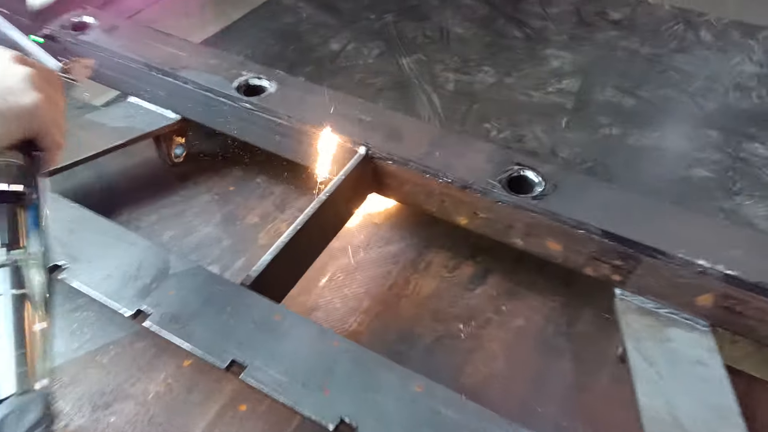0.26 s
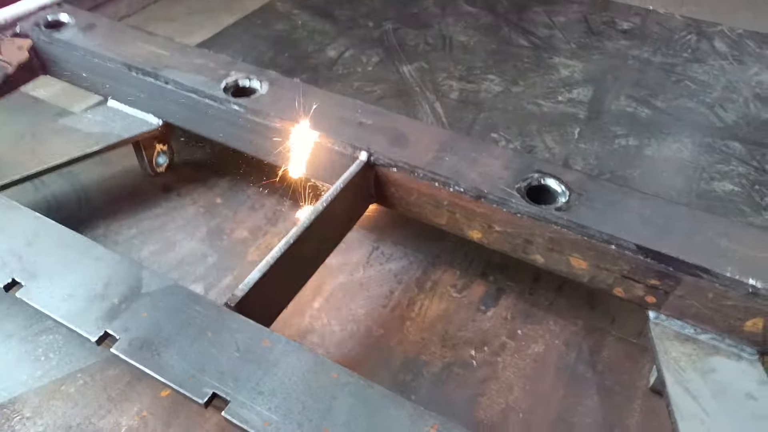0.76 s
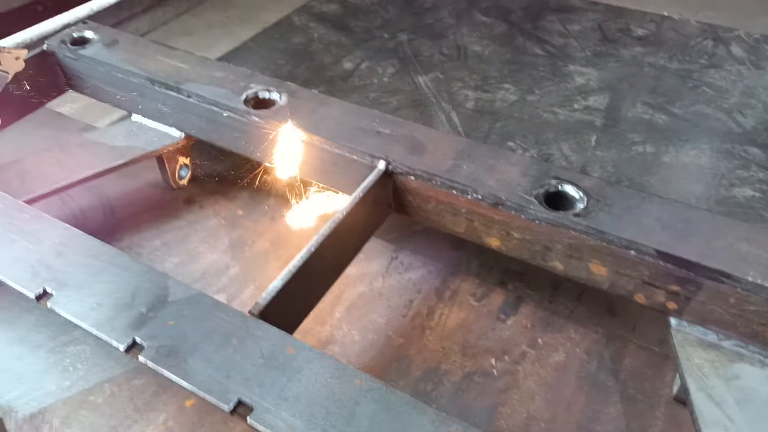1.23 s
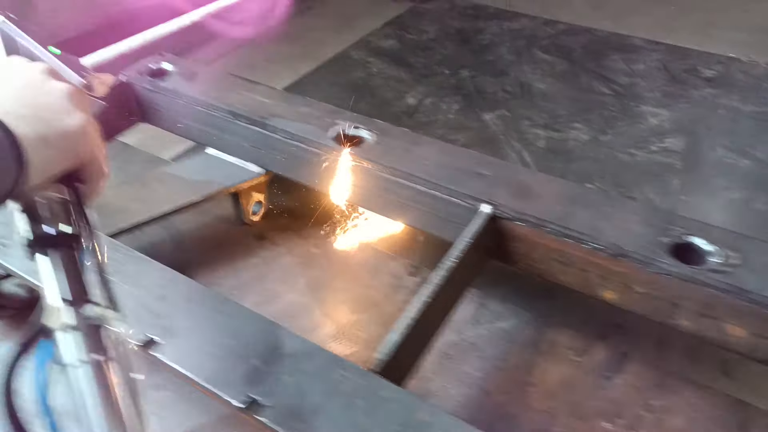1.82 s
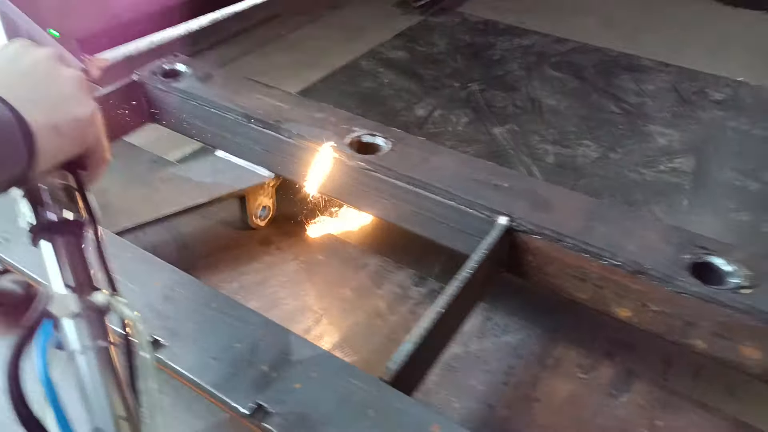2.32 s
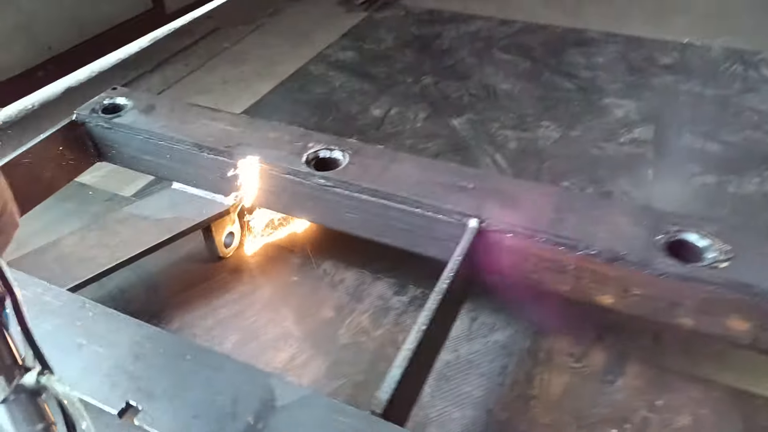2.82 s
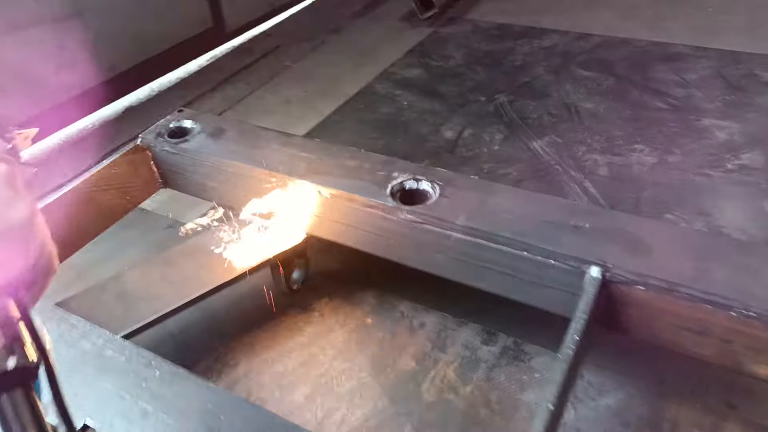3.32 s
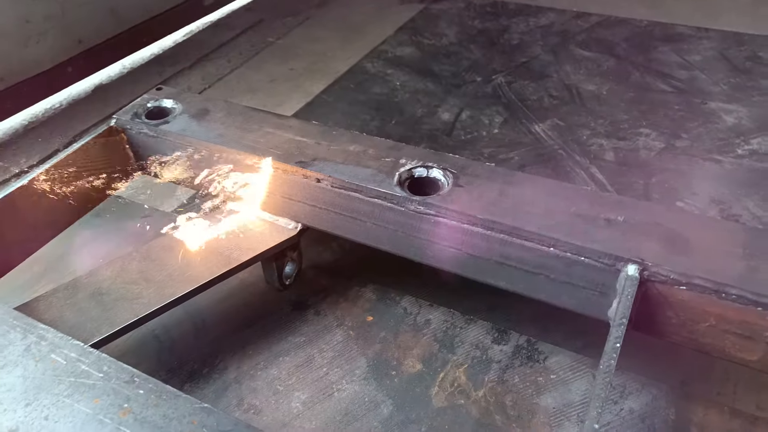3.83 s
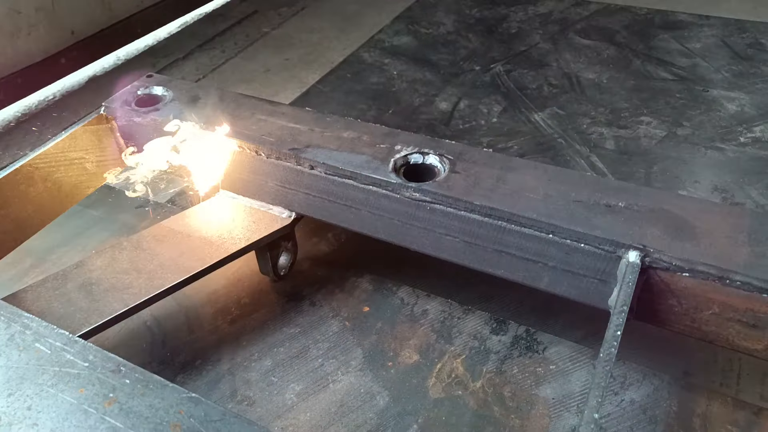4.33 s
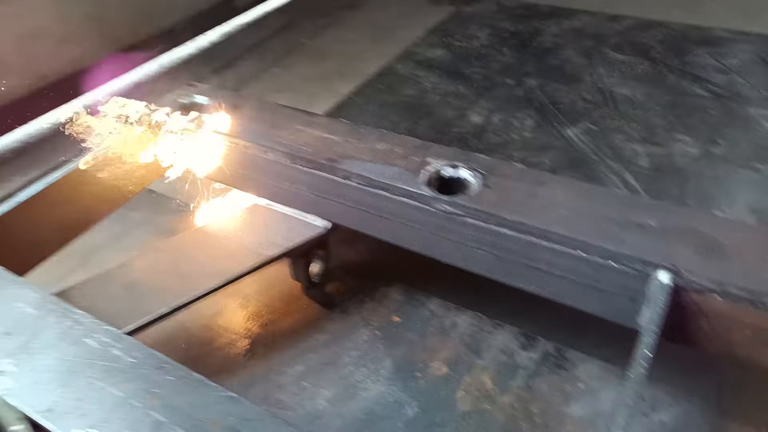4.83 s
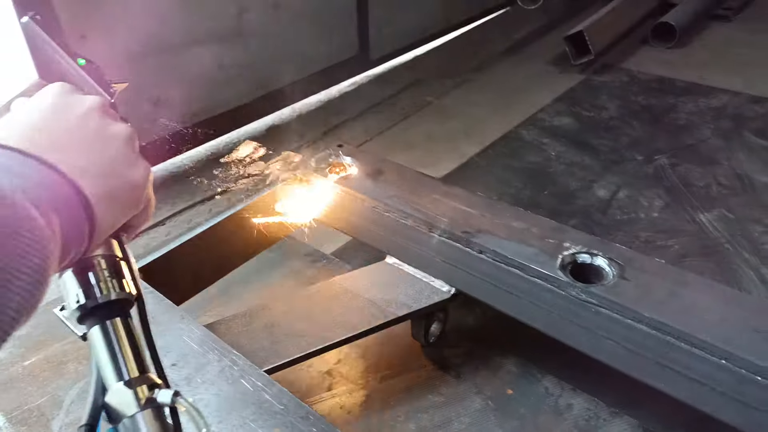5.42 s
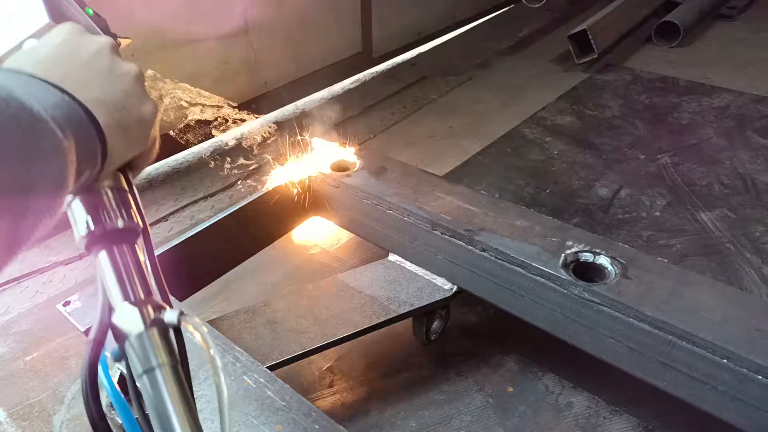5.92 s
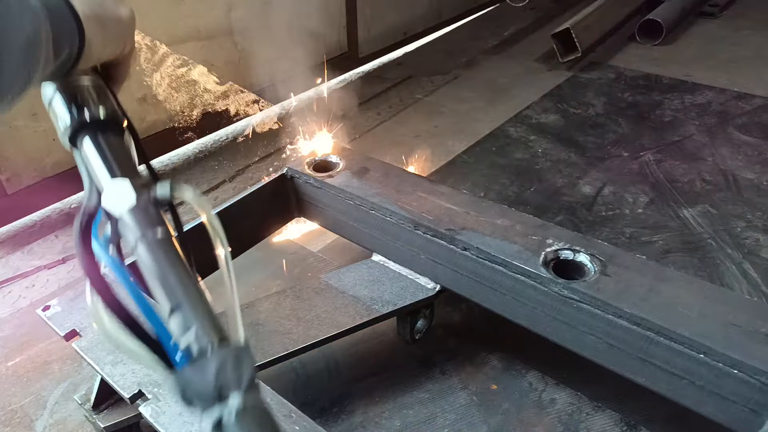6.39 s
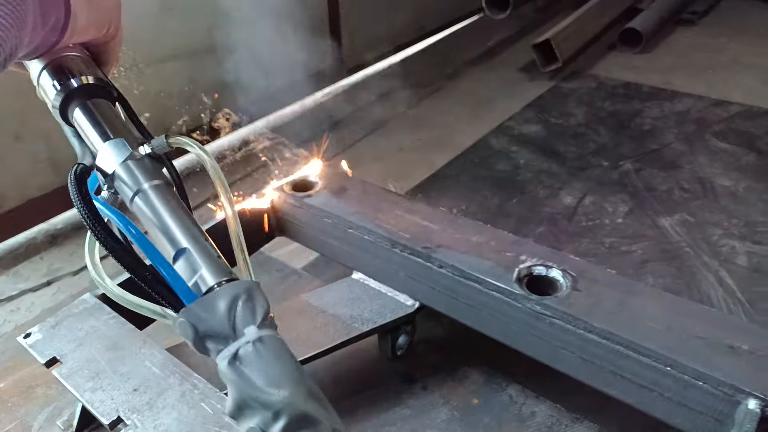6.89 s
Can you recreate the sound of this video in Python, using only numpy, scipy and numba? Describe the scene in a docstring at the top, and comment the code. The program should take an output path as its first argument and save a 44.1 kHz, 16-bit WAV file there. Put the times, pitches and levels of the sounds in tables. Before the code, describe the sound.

Handheld laser cleaner on a steel frame: steady shrill whine and hiss, rapid thirty-per-second burning bursts, crackling scale, occasional sharp pops in a workshop.

```python
"""In a workshop, a handheld laser cleaner strips a steel frame at arm's length from a phone.
The air jet that shields its lens is a self-sustained oscillator: it whistles unsteadily near 3 kHz.
Its turbulence rings the nozzle and hisses off the steel, where reflections comb the noise.
The beam swings to and fro about 32 times a second; each crossing of the metal knocks, puffs and sputters
as coating burns, through resonant gaps in the frame, with flame, crackling scale and popping flakes."""
import sys
import numpy as np
from scipy import signal
from scipy.fft import rfft, irfft
from scipy.io import wavfile
from scipy.ndimage import uniform_filter1d
from numba import njit

SR = 44100
rng = np.random.default_rng(int(sys.argv[2]) if len(sys.argv) > 2 else 0)


def store_wav(level_fs):
    """Save 16-bit WAV to argv[1]."""
    pcm = np.round(np.clip(np.atleast_2d(level_fs), -1, 1) * 32767)
    wavfile.write(sys.argv[1], SR, pcm.T.astype(np.int16))


N = 315315
TIME = np.arange(N) / SR  # seconds


def undb(db):
    """Level: decibels converted to an amplitude ratio."""
    return 10 ** (np.asarray(db) / 20)


def unit(x):
    """Normalisation: scale to rms 1."""
    return x / np.sqrt(np.mean(x ** 2))


def curves(table):
    """Linear interpolation: each column after the first, as a curve in time."""
    seconds, *columns = np.transpose(table)
    return [np.interp(TIME, seconds, column) for column in columns]


def noise():
    """White noise: turbulence with equal power at every frequency."""
    return rng.standard_normal(N)


def colour(x, points):
    """Spectral shaping: weight x by (Hz, dB) points joined over log frequency, then scale to rms 1."""
    hz, db = np.transpose(points)
    bins = np.maximum(np.arange(N // 2 + 1) * SR / N, 1)
    gain = undb(np.interp(np.log(bins), np.log(hz), db))
    return unit(irfft(rfft(x) * gain, N))


def wander(rate):
    """Low-passed random process: smooth chance of rms 1, mostly slower than rate in Hz."""
    bins = np.arange(N // 2 + 1) * SR / N
    return unit(irfft(rfft(noise()) / (1 + (bins / rate) ** 3), N))


@njit
def svf(x, hz, width):
    """Second-order resonance: a state-variable band-pass with a moving centre."""
    out, band, low = np.empty(len(x)), 0., 0.
    for i in range(len(x)):
        g, damping = np.tan(np.pi * hz[i] / SR), width / hz[i]
        v = (band + g * (x[i] - low)) / (1 + g * (g + damping))
        band, low = 2 * v - band, low + 2 * g * v
        out[i] = damping * v
    return out


def ring(x, hz, width):
    """Cascaded resonance: two equal band-passes, each width Hz wide, give steep skirts; rms 1."""
    hz = hz * np.ones(N)
    once = svf(x + 1e-18, hz, float(width))
    return unit(svf(once, hz, float(width)))


def flare_up(rows, rest_db, attack_s, release_s):
    """Energy addition: (start, length, dB) events rise up to the start, hold and die away, over a rest level."""
    power = undb(rest_db) ** 2
    for start, length, db in rows:
        rise = np.clip(1 + (TIME - start) / attack_s, 0, 1)
        fall = np.exp(-np.clip((TIME - start - length) / release_s, 0, 20))
        power = power + (undb(db) * rise * fall) ** 2
    return np.sqrt(power)


# Pitch of the jet's whistle. Each row: time in seconds, frequency in Hz.
JET_PITCH = [(0.1, 3005), (0.46, 2892), (1.75, 2966), (4.73, 2980), (7.0, 2917)]
# How strongly the whistle reaches the phone as the nozzle turns.
# Each row: time in seconds, relative level in dB.
JET_LEVEL = [(0.0, -15.5), (0.04, -17.5), (0.28, -19), (1.33, -17), (1.49, -15.5), (1.77, -24.5),
             (2.05, -16.5), (2.43, -19), (2.47, -17), (3.48, -10), (4.22, -8), (5.5, -8.5), (5.83, -11),
             (5.87, -9), (6.97, -12), (7.15, -10.5)]


def whistle():
    """Self-sustained oscillation: turbulence shakes the jet's pitch within the range the nozzle allows."""
    (hz,), (db,) = curves(JET_PITCH), curves(JET_LEVEL)
    shaken_hz = hz + 170 * np.tanh(.9 * wander(rate=190))
    tone = np.sin(2 * np.pi * np.cumsum(shaken_hz) / SR)
    tone = tone * undb(1.7 * wander(rate=81))
    rough = ring(noise(), hz, width=307)
    return (1.07 * unit(tone) + 0.31 * rough) * undb(db + 0.41 * wander(rate=42))


NOZZLE_DRIFT = .012  # rms drift of a rough tone, as a share of its frequency


def rough_tone(hz, width_hz, db):
    """Broadband excitation: turbulence rings one nozzle resonance, which strays a little at random."""
    return ring(noise(), hz * np.exp(NOZZLE_DRIFT * wander(rate=2.9)), width_hz) * undb(db)


# Rough tones of the nozzle that swell with the fine hiss and shift with the aim.
# Each row: frequency in Hz, stage width in Hz, level in dB at the mean fine hiss,
# swell in dB per dB of fine hiss, bend in Hz per dB of smoothed whistle level.
NOZZLE_MODES = [(2230, 410, -30.5, 1.15, 6), (2698, 317, -16, 0.64, 5), (4134, 330, -32.5, 0.3, 13)]
# Two rough tones above the whistle. Each row: time in seconds, relative level of the upper tone in dB,
# relative level of the top tone in dB.
UPPER_LEVEL = [(0.0, -33, -44), (0.08, -28, -35), (0.76, -20.5, -26), (1.33, -25.5, -27.5),
               (2.43, -21, -27), (2.75, -18.5, -37), (2.95, -17, -24.5), (3.19, -18.5, -29),
               (4.82, -20, -23.5), (5.71, -30, -29.5), (6.69, -21.5, -30), (7.07, -23, -38),
               (7.15, -19, -35)]
UPPER_HZ, UPPER_WIDTH_HZ = 3420, 560
TOP_TONE_HZ, TOP_WIDTH_HZ, TOP_BEND = 5390, 1300, -69  # bend in Hz per dB of smoothed whistle level
AIM_S = 0.42  # time over which the hand turns the nozzle


def nozzle_tones(fine_db):
    """Resonance under a turning aim: the whistle's smoothed level stands for the aim and bends the tones."""
    upper_db, top_db = curves(UPPER_LEVEL)
    swell_db = fine_db - fine_db.mean()
    aim_db = uniform_filter1d(curves(JET_LEVEL)[0], size=int(AIM_S * SR))
    aim_db = aim_db - aim_db.mean()
    tones = rough_tone(UPPER_HZ, UPPER_WIDTH_HZ, upper_db - .6)
    tones = tones + rough_tone(TOP_TONE_HZ + TOP_BEND * aim_db, TOP_WIDTH_HZ, top_db - 5.0)
    for hz, width, db, swell, bend in NOZZLE_MODES:
        tones = tones + rough_tone(hz + bend * aim_db, width, db + swell * swell_db)
    return tones


def off_steel(x, lag_ms, share):
    """Comb filtering: add a reflection whose path changes slowly as the hand moves."""
    lag = lag_ms / 1000 * np.exp(.04 * wander(.3))
    return unit(x + share * np.interp(TIME - lag, TIME, x))


# Spectra of the low rush, the hiss and the fine hiss. Each row: frequency in Hz, relative density in dB per Hz.
LOW_RUSH = [(100, -87), (750, -10.5), (1000, -5), (1200, -5), (1500, -3), (1800, -0.5), (2500, -12),
            (4000, -41)]
HISS = [(100, -76), (1500, -60), (3000, 0.5), (4000, 2), (4650, 4), (5300, 7), (6200, 4), (6750, 7),
        (7500, 2.5), (8200, -7.5), (9500, -59)]
FINE_HISS = [(100, -62), (6000, -13), (8300, 0), (9300, 0), (10300, 0), (11300, -4), (13000, -7.5),
             (14000, -8), (14700, 2), (15800, -8.5)]
# Low rush of air. Each row: time in seconds, relative level in dB.
RUSH_LEVEL = [(0.0, -46), (0.08, -32), (0.52, -37), (0.57, -42.5), (0.98, -36.5), (2.63, -39.5),
              (2.87, -40.5), (5.77, -36.5), (5.99, -40), (6.75, -32.5), (6.95, -46), (7.15, -36.5)]
# Air striking the steel as the spot moves. Each row: time in seconds, relative hiss level in dB,
# relative fine hiss level in dB.
AIR_LEVEL = [(0.0, -32, -44), (0.28, -28, -38), (1.02, -28.5, -36.5), (1.13, -27.5, -36),
             (1.85, -29.5, -38.5), (2.47, -27, -38), (2.65, -33.5, -43), (2.89, -34.5, -41),
             (3.44, -33.5, -42.5), (4.38, -32, -41.5), (5.83, -36, -49), (6.57, -32, -44.5),
             (6.97, -32.5, -47), (7.15, -34, -44)]
# Nearby faces of steel that reflect the hiss. Each row: mean lag in milliseconds, share of the amplitude.
REFLECTIONS = [(.95, .2), (1.45, .2), (2.15, .26)]


def rushing_air():
    """Turbulent jet noise: bands of hiss, combed by the steel, beneath the rough tones of the nozzle."""
    hiss_db, fine_db = curves(AIR_LEVEL)
    rush = colour(noise(), LOW_RUSH) * undb(curves(RUSH_LEVEL)[0] + 1.0)
    hiss = colour(noise(), HISS) * undb(hiss_db + 3.0)
    fine = colour(noise(), FINE_HISS) * undb(fine_db + 1 + 0.45 * wander(rate=35))
    air = rush + hiss + fine
    combed = air
    for lag_ms, share in REFLECTIONS:
        combed = off_steel(combed, lag_ms, share)
    return nozzle_tones(fine_db) + combed * np.std(air)


# When the beam meets the steel. Each row: time in seconds, phase of the outward stroke in turns of the mirror,
# phase of the return stroke in turns.
CROSSINGS = [(0, .5, .68), (1, .57, .68), (1.7, .6, .73), (2.8, .72, .79), (3.5, .77, .85),
             (4.3, .78, 1.04), (5.3, .78, 1.1), (5.8, .88, 1.0), (6.1, .76, 1.2), (6.35, .62, 1.43),
             (6.7, .54, 1.47), (7.15, .5, 1.5)]
SWEEP_HZ = 31.81


def crossings(spread, return_db):
    """Periodic excitation: a Gaussian burst, spread turns in deviation, each time the beam crosses the steel."""
    bursts = 0
    for turn, db in zip(curves(CROSSINGS), (0, return_db)):
        phase = SWEEP_HZ * TIME - turn + .003 * wander(rate=15)
        offset = (phase + .5) % 1 - .5  # turns from the crossing
        strength = undb(db + 1.5 * wander(rate=14))
        bursts = bursts + strength * np.exp(-.5 * (offset / spread) ** 2)
    return bursts


# Patches of coating that the beam burns off. Each row: start in seconds, length in seconds,
# mean resonance of the gap beneath in Hz, then relative levels of puff, sputter and sizzle in dB.
PATCHES = [(0.056, 0.27, 390, -34.5, -31, -40), (0.424, 0.15, 390, -56, -37.5, -47),
           (0.608, .22, 400, -90, -42.5, -44), (0.914, 0.091, 377, -36.5, -36, -38),
           (1.083, 0.56, 384.3, -39, -40.5, -46.5), (1.603, 0.39, 400, -44.5, -39.5, -48),
           (2.092, .21, 392, -37.5, -45, -41), (2.394, 0.26, 390.5, -58, -48, -49),
           (2.596, 0.25, 417, -34.5, -39, -43.5), (2.9, 0.34, 384, -41.5, -44, -50.5),
           (3.293, 0.26, 402, -40.5, -77, -49), (4.04, 0.14, 364, -58, -53, -39.5),
           (4.199, 0.44, 330, -43, -36.5, -37), (4.64, 0.31, 332, -40.5, -44, -39),
           (4.977, 0.12, 337, -58, -47, -45), (5.208, 0.17, 351.1, -43.5, -39, -34.5),
           (5.786, 0.55, 369, -35, -37, -37.5), (6.338, 0.11, 407, -34, -31, -31),
           (6.514, 0.19, 385, -29.5, -31, -29.5), (6.77, 0.15, 376, -45, -39.5, -37),
           (7.046, 0.087, 390, -40, -46, -38)]
# Where the steel is already clean: relative levels of puff, sputter and sizzle in dB.
BARE_STEEL_DB = (-52, -73, -62)
CATCH_S, DIE_S = 0.048, 0.026  # rise time and decay time constant of a patch


def coating():
    """Source strength: puff, sputter and sizzle follow the beam from patch to patch."""
    start, length, _, *levels = np.transpose(PATCHES)
    return [flare_up(zip(start, length, db), rest, CATCH_S, DIE_S) for db, rest in zip(levels, BARE_STEEL_DB)]


SPUTTER_RATIO, SIZZLE_HZ = 1.748, 980  # the gap's second resonance over its first; its third stays put
KNOCK_SHARE = 0.37  # gain of the broad knock


def burning():
    """Forced resonance: each crossing's vapour knock and rough puff ring the gaps in the frame."""
    puff, sputter, sizzle = coating()
    push = unit(np.diff(crossings(spread=0.0015, return_db=3.5), prepend=0))
    gate = crossings(spread=0.07, return_db=-5) + 0.33
    drive = push + 1.4 * unit(gate * noise())
    # the gaps ring a little differently as the spot travels
    start, length, hz, *_ = np.transpose(PATCHES)
    gap_hz = np.interp(TIME, start + length / 2, hz)
    gap_hz = gap_hz * np.exp(0.045 * np.tanh(wander(rate=6.9)))
    puffs = ring(drive, gap_hz, width=165) * puff
    puffs = puffs - ring(drive, SPUTTER_RATIO * gap_hz, width=270) * sputter
    puffs = puffs - ring(drive, SIZZLE_HZ, width=198) * sizzle
    knocks = KNOCK_SHARE * ring(push, 700, width=610) * np.sqrt(puff * sputter)
    high_pass = signal.butter(4, 235, "high", fs=SR, output="sos")
    return signal.sosfilt(high_pass, puffs + knocks)


# Resonances under the flame, between the steel members, the deep one first.
# Each row: frequency in Hz, stage width in Hz, relative level in dB.
FLAME_MODES = [(128, 47, 4), (183, 110, -0.5)]
# The vapour flares into a large flame. Each row: start in seconds, length in seconds, relative level in dB.
FLARES = [(.07, 0.067, -37), (.22, .11, -49.5), (1.35, 0.037, -49.5), (1.54, 0.037, -46), (3.08, .06, -53),
          (4.27, .08, -50), (4.47, 0.061, -67), (4.75, 0.058, -68), (5.8, .48, -36.5), (6.5, .26, -34.5)]
EMBER_DB = -68.5  # relative level of the small flame between flares
DEEPENING = .7  # exponent: the larger the flame, the more its lowest resonance takes over


def flame():
    """Combustion noise: a large flame rumbles and flutters with the sweep; a small one has little depth."""
    pulses = unit(crossings(spread=0.005, return_db=-2))
    gate = crossings(spread=0.09, return_db=-9) + 0.4
    drive = pulses + 4 * unit(gate * noise())
    size = flare_up(FLARES, EMBER_DB, attack_s=.04, release_s=0.032)
    deep, upper = (undb(db - 5.5) * ring(drive, hz, width) for hz, width, db in FLAME_MODES)
    return (deep * (size / size.max()) ** DEEPENING + 1.6 * upper) * size


# Spectrum of bursting scale. Each row: frequency in Hz, relative density in dB per Hz.
CRACKLE = [(100, -88), (700, -29), (1200, -16), (2000, 2), (4000, 2.5), (5300, 5), (6500, 2.5), (8000, -21),
           (15000, -36)]
# Rusty edges where scale bursts off. Each row: start in seconds, length in seconds, relative level in dB.
RUSTY_EDGES = [(.15, .15, -56), (2.55, 0.34, -28), (4.25, .2, -37), (5.55, 0.19, -34.5), (6.4, .35, -28.5)]
SCALE_DB = -36  # relative level of crackle everywhere


def crackle():
    """Random impulse train: flakes burst in a dense spray at each crossing, lightly except on rusty edges."""
    per_second = 9000 * (crossings(spread=.025, return_db=-1) + .05)
    grains = (rng.random(N) < per_second / SR) * noise()
    return colour(grains, CRACKLE) * flare_up(RUSTY_EDGES, SCALE_DB, attack_s=0.25, release_s=0.1)


# Spectrum of a pop. Each row: frequency in Hz, relative density in dB per Hz.
POP = [(150, -34), (350, -8), (1000, -1), (2200, -1), (5000, 7), (8000, -24), (15000, -22)]
# Single large flakes popping off. Each row: time in seconds, relative peak level in dB.
POPS = [(2.755, -28), (2.788, -21), (2.818, -30), (2.836, -26), (3.101, -16), (3.382, -24), (5.332, -10),
        (5.347, -25), (5.394, -33)]
POP_DECAY_S = .0015  # time constant


def pops():
    """Transient radiation: a large flake bursts off with a short, wide-band crack."""
    bursts = flare_up([(s, 0, db) for s, db in POPS], -120, attack_s=0.00042, release_s=POP_DECAY_S)
    return colour(noise(), POP) * bursts


# Where sound off the steel cancels the direct sound.
# Each row: time in seconds, lower dip in Hz, upper dip in Hz.
DIPS = [(0, 2600, 3500), (1.4, 2540, 3420), (1.7, 2360, 2920), (2.2, 2400, 2930), (2.7, 2400, 3360),
        (3.6, 2310, 3240), (4.7, 2300, 3530), (5.4, 2540, 3270), (6.2, 2670, 3290), (7.15, 2430, 2960)]


def cancel(x, depth, width_hz):
    """Destructive interference: reflections carve two moving dips near the whistle."""
    for hz in curves(DIPS):
        x = x - depth * svf(x, hz, float(width_hz))
    return x


def workshop(x, t60, wet_db, count=4):
    """Reverberation: a diffuse exponential tail whose pattern shifts as tool and phone move."""
    t = TIME[:SR]
    decay = np.exp(-np.log(1000) * t / t60) * (t > .004)
    tails = rng.standard_normal((count, SR)) * decay
    tails /= np.linalg.norm(tails, axis=1, keepdims=True)
    weights = np.array([wander(rate=0.47) for _ in tails])
    weights /= np.linalg.norm(weights, axis=0)
    wet = sum(w * signal.oaconvolve(x, tail)[:N] for w, tail in zip(weights, tails))
    return (x + undb(wet_db) * wet) / np.hypot(1, undb(wet_db))


# Spectrum of the room air. Each row: frequency in Hz, relative density in dB per Hz.
SHOP = [(20, -23), (55, -22), (100, -7), (250, -11.5), (600, 5.5), (1500, 6.5), (8000, -2)]


def room_air():
    """Stationary background noise: faint, steady air in the workshop."""
    return colour(noise(), SHOP) * undb(-46)


def scene():
    """Superposition: jet and crackle with a long tail, fire and pops with a short one, over room air."""
    jet = workshop(whistle() + rushing_air() + crackle(), t60=1.0, wet_db=-7.5)
    jet = cancel(jet, depth=0.54, width_hz=150)
    fire = workshop(burning() + flame() + pops(), t60=.16, wet_db=-9)
    return (jet + fire + room_air())[None]


# Noise level under which the phone turns a band down. Each row: frequency in Hz, density in dB per Hz.
SUPPRESSOR = [(170, -118), (260, -75), (400, -71), (700, -71.5), (1100, -68), (1600, -75.5), (2200, -108)]


def suppress(x, slope, floor_db, size=1024):
    """Spectral gating: turn down each narrow band while it is weaker than the expected noise."""
    hz, _, z = signal.stft(x, SR, nperseg=size, scaling="psd")
    power = uniform_filter1d(2 * np.abs(z) ** 2, size=5, axis=0)  # smoothed over bands
    power = uniform_filter1d(power, size=5, axis=1)  # and over time frames
    threshold = undb(np.interp(hz, *np.transpose(SUPPRESSOR)))[:, None] ** 2
    gain = np.clip((np.abs(power) / threshold) ** slope, undb(floor_db), 1)
    return signal.istft(z * gain, SR, nperseg=size, scaling="psd")[1][:N]


@njit
def follow(x, attack, release):
    """Envelope detection: a peak follower that rises fast and falls more slowly."""
    out, envelope = np.empty(len(x)), 0.
    for i in range(len(x)):
        envelope += (x[i] - envelope) * (attack if x[i] > envelope else release)
        out[i] = envelope
    return out


def limit(x, knee_db, slope, release_s):
    """Dynamic compression: turn the gain down while the peak envelope exceeds the knee."""
    peak = follow(np.abs(x), .1, 1 / (release_s * SR))
    return x * np.maximum(peak / undb(knee_db), 1) ** -slope


TOP_HZ = 15800  # upper edge of the phone's pass band


def record(dry):
    """Nonlinear transduction: the phone gates weak noise, compresses and clips, then cuts the treble."""
    clean = suppress(dry[0], slope=1.213, floor_db=-24)
    held = limit(clean * undb(0.54), knee_db=-8.0, slope=0.28, release_s=0.0087)
    clipped = np.clip(held, -1, 1)
    low_pass = signal.ellip(10, .2, 70, TOP_HZ, fs=SR, output="sos")
    return signal.sosfilt(low_pass, clipped)[None]


dry = scene()
out = record(dry)
store_wav(out)
```